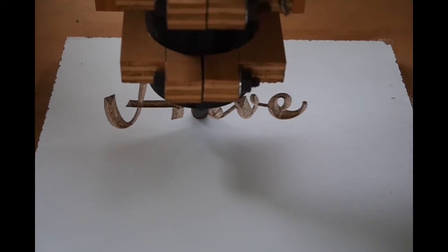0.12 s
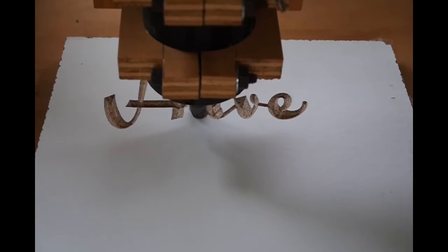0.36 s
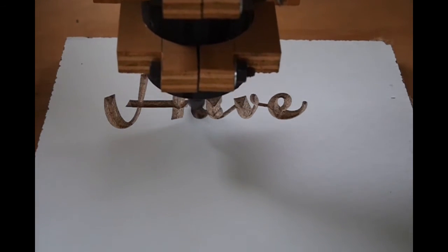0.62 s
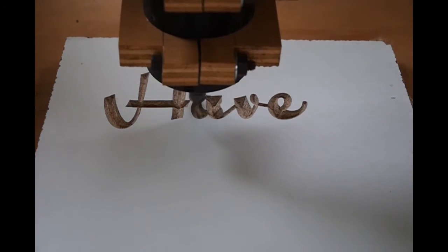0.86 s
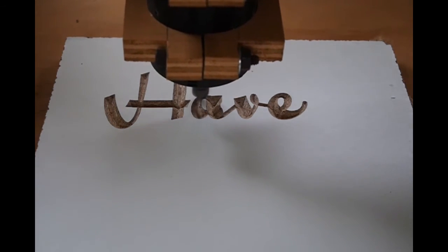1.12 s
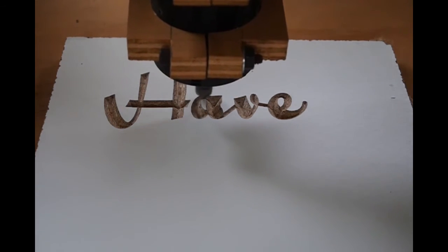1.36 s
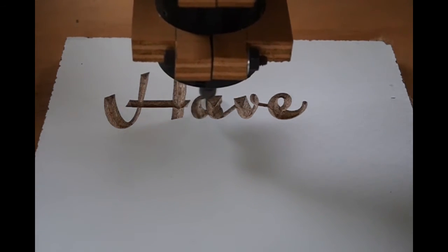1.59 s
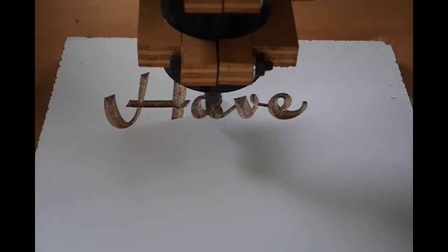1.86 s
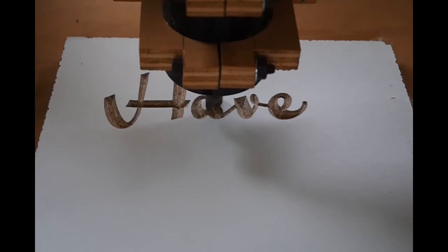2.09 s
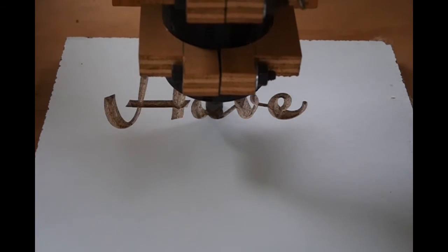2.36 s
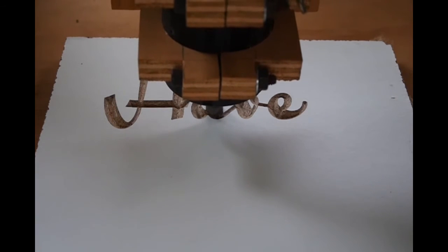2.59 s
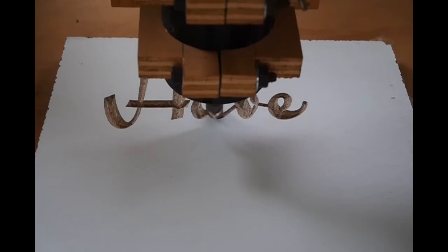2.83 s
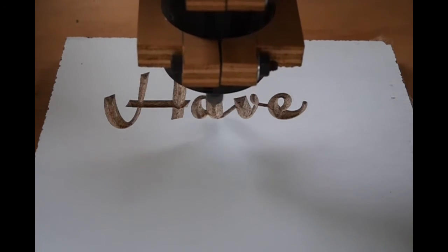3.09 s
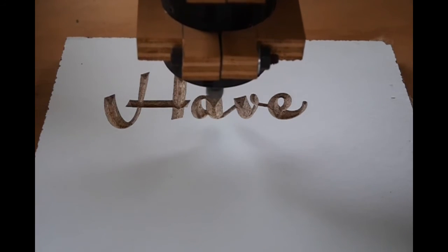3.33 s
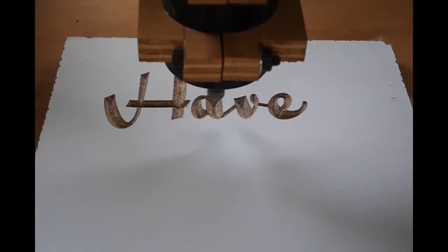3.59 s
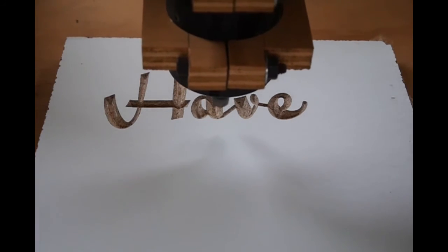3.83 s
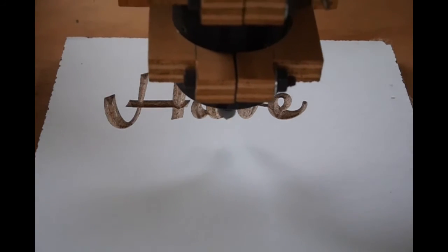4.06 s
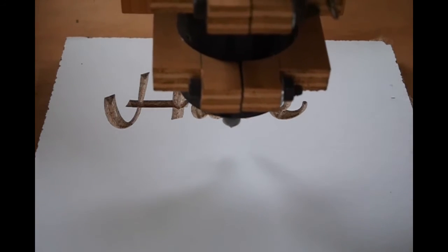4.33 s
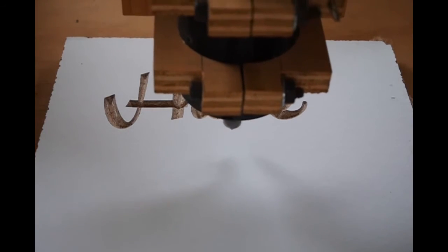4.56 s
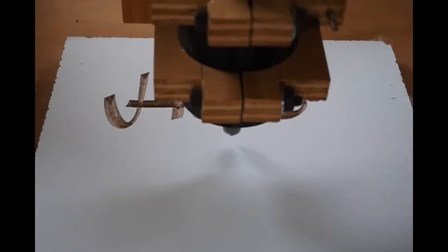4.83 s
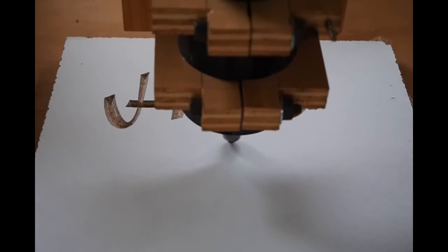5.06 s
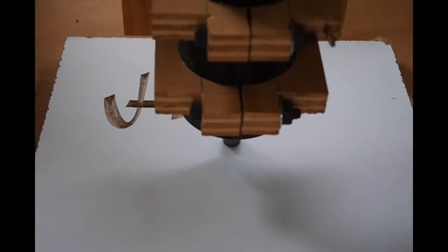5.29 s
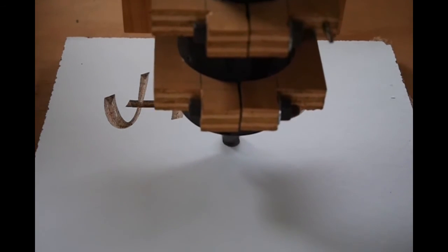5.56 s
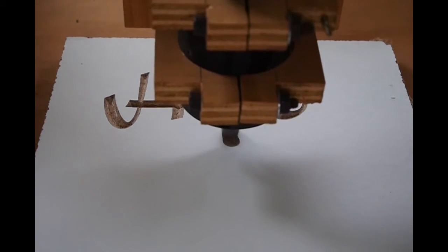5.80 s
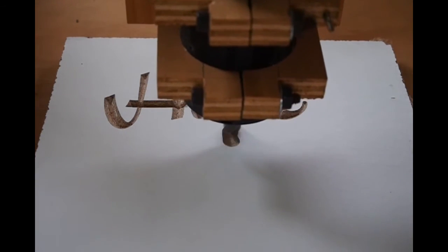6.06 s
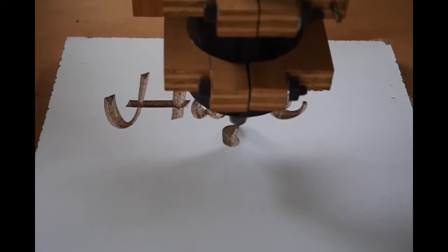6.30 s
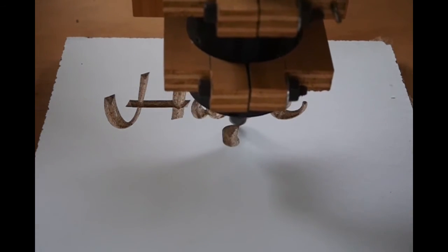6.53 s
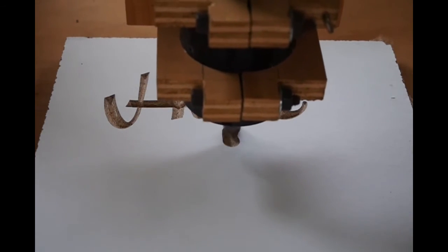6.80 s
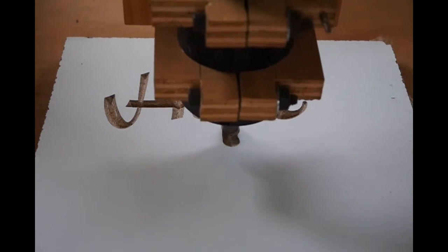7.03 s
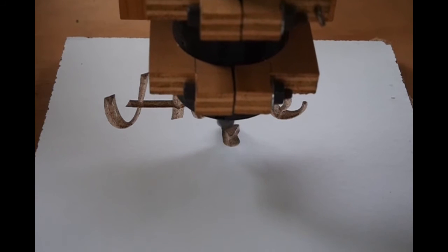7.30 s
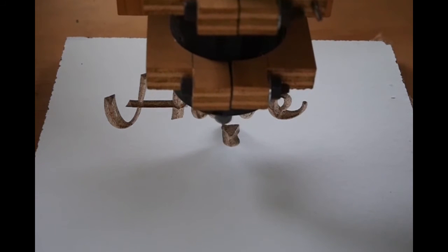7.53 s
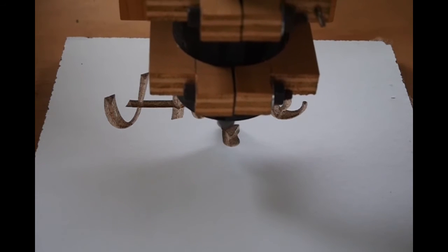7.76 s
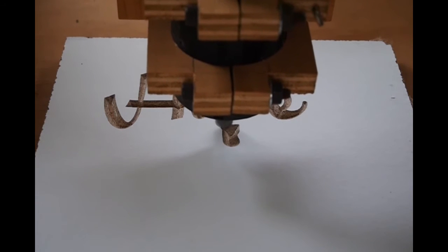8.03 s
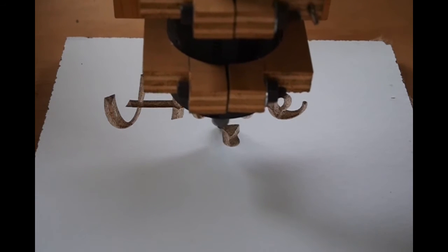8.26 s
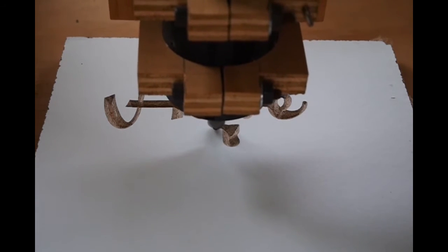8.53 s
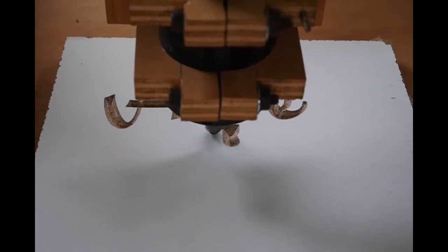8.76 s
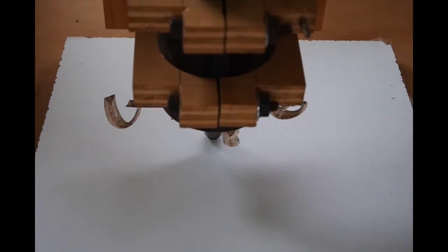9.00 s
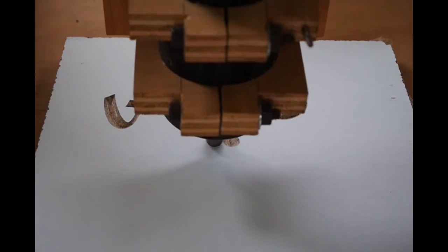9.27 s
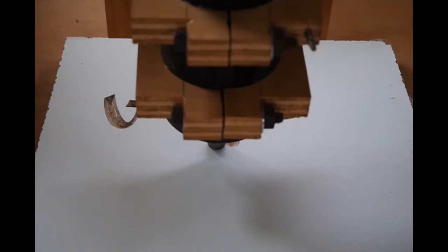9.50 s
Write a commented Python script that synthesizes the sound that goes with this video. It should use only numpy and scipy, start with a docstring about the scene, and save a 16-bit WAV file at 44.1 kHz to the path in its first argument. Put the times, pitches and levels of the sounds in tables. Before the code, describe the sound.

Close up, a little carving spindle holds a piercing layered whine and airy hiss, sagging slightly under deep cuts amid short low motor hums.

```python
"""A small router spindle carves a board close to a camera for 9.6 s, whining at multiples of its 571-590 turns a second.
At first the bit chatters faintly at half the shaft rate until 1.2 s; two step tones of axis travel run down by 2.1 s,
and a fainter short move hums until 2.6 s. From 2.45 s deep cuts bring louder chatter; steppers hum again, a thin tone
sounds at 10/3 of the shaft rate and the shaft sags to its slowest near 4.9 s. Chatter ends at 5.8 s; the shaft recovers
amid short axis moves. Throughout, fan noise rushes and hisses through carriage and housing, over faint microphone noise."""
import sys
import numpy as np
from scipy import signal
from scipy.fft import rfft, irfft, next_fast_len
from scipy.io import wavfile
from scipy.ndimage import uniform_filter1d, map_coordinates

SR = 44100
rng = np.random.default_rng(int(sys.argv[2]) if len(sys.argv) > 2 else 0)


def master_out(mix):
    """Clip the mix to full scale and print it as 16-bit PCM to the path in sys.argv[1]."""
    frames = np.transpose(np.atleast_2d(mix))
    ceiling = np.clip(frames, -1, 1)
    pcm = np.round(ceiling * 32767).astype(np.int16)
    wavfile.write(sys.argv[1], SR, pcm)


def how_loud(loudness_db):
    """Turn decibels into a plain amplitude multiplier (0 dB gives 1, 20 dB gives 10)."""
    steps = np.asarray(loudness_db, float) / 20
    return 10 ** steps


N = 424683


def unit(x):
    """Scaled to rms 1."""
    return x / np.sqrt(np.mean(x ** 2) + 1e-20)


def along(points, hz):
    """(Hz, value) points interpolated on a log frequency axis."""
    point_hz, value = np.transpose(points)
    return np.interp(np.log(hz + 1), np.log(point_hz + 1), value)


def curves(rows):
    """One value per sample for each column after the time in seconds."""
    time_s, *columns = np.transpose(rows)
    return [np.interp(np.arange(N) / SR, time_s, column) for column in columns]


def wobble(knots_per_s):
    """Smooth random curve through normally distributed knots."""
    knots = rng.standard_normal(int(N * knots_per_s / SR) + 4)
    return map_coordinates(knots, [np.arange(N) * knots_per_s / SR])


def filtered(x, response):
    """x with its spectrum multiplied by a response of frequency in Hz."""
    size = next_fast_len(N + SR // 2)
    return irfft(rfft(x, size) * response(np.fft.rfftfreq(size, 1 / SR)), size)[..., :N]


def tone(phase_rad, rms_db, lean_db=0.0, lead_rad=0.0):
    """Stereo sine at random start phase; left exceeds right by lean_db and leads it by lead_rad."""
    phase_rad = phase_rad + rng.uniform(0, 2 * np.pi)
    left = np.sin(phase_rad + lead_rad / 2) * how_loud(lean_db / 2)
    right = np.sin(phase_rad - lead_rad / 2) * how_loud(-lean_db / 2)
    return np.sqrt(2) * how_loud(rms_db) * np.array([left, right])


def passing_db(k):
    """Fades and swells of shaft multiple k as the head passes, each a cosine-squared bump."""
    # By shaft multiple. Each row: middle in seconds, length in seconds, change in dB.
    passing = {2: [(.1, 1.3, 4), (1.25, 1, -16), (3.9, 1.6, 8.5), (6.35, 1.8, 5.5)], 3: [(3.9, 0.94, 4)],
               7: [(2.1, .8, -3), (3.55, 0.81, 0), (6.1, 2, -11)], 5: [(4.9, 2.8, -5)], 8: [(.1, .36, -8),
               (1.66, 0.41, -10), (3.47, 0.31, -15), (4.57, 0.39, -11), (5.22, .36, -10)],
               16: [(4.1, 0.99, -5.5), (5.88, 0.37, -6.5), (7.5, 0.86, -2.5)], 20: [(4.6, 4, 9)],
               22: [(1, 5, 7), (5.5, 1.4, -5)], 11: [(6.9, 2, 4)]}
    t = np.arange(N) / SR
    return sum(change_db * np.cos(np.pi * np.clip((t - middle_s) / length_s, -.5, .5)) ** 2
               for middle_s, length_s, change_db in passing.get(k, []))


def lift_db(hz):
    """Gain of the resonances of carriage and housing."""
    # Each row: centre in Hz, width in Hz, lift in dB.
    body = [(101, 18, 4), (138, 7, 1), (199, 17, 5), (816, 67, 7.5), (908, 92, 8.5), (1294, 190, 4),
            (3550, 120, 4), (3636, 450, 4), (4340, 260, 4)]
    return sum(peak_db / (1 + (2 * (hz - centre_hz) / width_hz) ** 2)
               for centre_hz, width_hz, peak_db in body)


def whine(turn_rad):
    """Commutator, fan blades and bearings sound at whole multiples of the shaft angle."""
    # Strong shaft multiples, in the column order of the next two tables.
    high_orders = (8, 12, 16, 24)
    # Slow levels as the head travels. Each row: time in seconds, then base level in dB of each strong multiple.
    spindle = [(0, -36.5, -32, -23.5, -33), (1.45, -32, -34.5, -22.5, -36), (2.1, -29.5, -34, -23.5, -35.5),
               (3, -32, -39, -22, -38), (3.6, -31.5, -36, -24.5, -34.5), (4.4, -31, -43, -21.5, -34),
               (4.9, -37, -34, -25, -33), (5.6, -27.5, -41, -25, -29.5), (6.2, -25, -38, -26.5, -31),
               (7, -31.5, -34.5, -24, -31), (9.63, -32, -35, -23, -32)]
    # Lean as the head travels. Each row: time in seconds, then left over right in dB of each strong multiple.
    lean = [(0, 13, 0, -1.5, 3), (1.6, 1.5, -1, 2.5, 0), (3.54, 4, -5, -1, -3), (4.65, -9, -5, -2.5, 2),
            (5.7, 3.5, 4, -3.5, -2), (6.75, 5.5, -4, -.6, 0), (9.63, -1, -4, -1.5, -.8)]
    # Weak shaft multiples, and the base level in dB of each.
    weak_orders = (6, 9, 11, 15, 17, 20, 22, 23)
    weak_db = (-45, -51.5, -48.5, -44, -43, -57, -49, -54)

    out = np.zeros((2, N))
    for k, base_db, lean_db in zip(high_orders, curves(spindle), curves(lean)):
        level_db = base_db + passing_db(k) + 0.36 * wobble(13) + 0.99 * wobble(3.97)
        out += tone(k * turn_rad, level_db, lean_db, 0.24 + 0.45 * wobble(1.55))
    for k, base_db in zip(weak_orders, weak_db):
        level_db = base_db + passing_db(k) + 1.5 * wobble(2.2)
        out += tone(k * turn_rad, level_db, 2.5 * wobble(1.15))
    return out


def cutting_edges(turn_rad):
    """Unbalance and edges meeting the wood once a turn sound at low multiples of a shuddering shaft angle."""
    # Shaft multiples whose base level varies with the cut.
    cut_orders = (1, 3, 5)
    # Each row: time in seconds, then base level in dB of each of those multiples.
    cut = [(0, -42.5, -35.5, -38), (1.27, -46, -39, -44), (1.57, -37, -55, -44), (2.5, -35.5, -45, -39),
           (4.2, -33.5, -43, -39.5), (5.7, -40, -50, -46.5), (7.5, -34.5, -57, -41),
           (9.63, -33.5, -57, -49)]
    # Shaft multiples of constant base level, and that level in dB.
    steady_orders = (2, 7)
    steady_db = (-45, -39.5)
    # Mean lean by shaft multiple: left over right in dB.
    low_lean_db = {1: -1.5, 2: 6.5, 3: -7, 5: 2, 7: -4}
    shudder_rad, flicker_db = 0.025, 1.7  # each scales a random curve

    base_db = dict(zip(cut_orders + steady_orders, curves(cut) + list(steady_db)))
    edge_rad = turn_rad + shudder_rad * wobble(30)
    out = tone(4 * edge_rad, base_db[3] - 3.5)  # the fourth rises and falls with the third's base level
    for k, db in base_db.items():
        level_db = db + passing_db(k) + flicker_db * wobble(12)
        out += tone(k * edge_rad, level_db, low_lean_db[k] + wobble(1.6))
    return out


def chatter(turn_rad):
    """Every second turn bites harder, unevenly: tones at half the shaft rate and odd halves of it."""
    # Each row: start in seconds, end in seconds, level in dB.
    spells = [(-.1, 1.2, -55.5), (2.45, 2.953, -46), (3.138, 4.914, -44.5), (5, 5.786, -42.5)]
    # Level in dB of the tones at 5/2 and 7/2 of the shaft rate, against the half tone.
    odd_db = (-1, -1)
    ramp_s = 0.084
    t = np.arange(N) / SR
    bite = sum(how_loud(db) * np.clip(np.minimum(t - start_s, end_s - t) / ramp_s, 0, 1)
               for start_s, end_s, db in spells)
    half = tone(turn_rad / 2 + .4 * wobble(24), 1.8 * wobble(22))
    odd = sum(tone((k + 5 / 2) * turn_rad, db + 1.9 * wobble(3.9)) for k, db in enumerate(odd_db))
    return bite * (half + odd)


def thin_tone(turn_rad):
    """A deep cut sounds at 10/3 of the shaft rate, fading in and out linearly."""
    # Start in seconds, end in seconds, base level in dB.
    thirds = (4.15, 4.85, -42)
    start_s, end_s, db = thirds
    t = np.arange(N) / SR
    fade = np.clip(np.minimum(t - start_s, end_s - t) / .08, 0, 1)
    return fade * tone(10 / 3 * turn_rad, db + 3 * wobble(8))


def steppers():
    """Each move ramps the step rate up, holds it and ramps down; its tones ring louder on a resonance."""
    # Each row: at speed in seconds, braking in seconds, full rate in steps per second,
    # step tone in dB, octave in dB (both at full rate, before resonance and wavering).
    moves = [(-.1, 1.43, 139, -56, -66), (-.1, 1.25, 96, -74, -61), (1.85, 1.96, 106, -62, -66),
             (3.9, 4.36, 138, -54.5, -64), (3.87, 4.45, 97, -69, -59.5), (4.97, 5.1, 97, -65, -64),
             (5.45, 5.72, 96, -61.5, -57), (6.8, 7.05, 97, -70, -55.5), (7.75, 7.8, 98, -72, -59),
             (8.08, 8.25, 94, -74, -59), (8.7, 8.76, 98, -74, -59), (9.25, 9.33, 96, -68, -59)]
    ramp_s = .65  # from rest to speed and back
    slow_fade = 3.5  # the step tone grows with this power of the rate, its multiples more gently
    t = np.arange(N) / SR
    out = np.zeros((2, N))
    for fast_s, brake_s, full_hz, step_db, octave_db in moves:
        span = slice(max(round((fast_s - ramp_s) * SR), 0), round((brake_s + ramp_s) * SR))
        knots_s = [fast_s - ramp_s, fast_s, brake_s, brake_s + ramp_s]
        speed = np.interp(t[span], knots_s, [0, 1, 1, 0])
        rate_hz = full_hz * speed
        steps_rad = 2 * np.pi * np.cumsum(rate_hz) / SR
        partials = ((1, step_db), (3 / 2, octave_db - 5), (2, octave_db), (3, octave_db - 4))
        for k, base_db in partials:
            level_db = base_db + 1.5 * lift_db(k * rate_hz) + 2.4 * wobble(8)[span]
            out[:, span] += speed ** (slow_fade / k) * tone(k * steps_rad, level_db, lead_rad=.4)
    return out


def noise(spectrum, patchy_db):
    """Stereo noise of rms 1 through the body's resonances, with random gain patches and slowly drifting ripple."""
    # Stereo width. Each row: frequency in Hz, side against mid in dB.
    width = [(60, -9), (120, -17), (450, -14.5), (650, -12), (900, -14), (1500, -9.5), (2050, -11),
             (2400, -10.5), (4000, -10), (5100, -6), (7000, -10), (13500, -7), (14600, -9)]
    surge_per_db = 0.07  # patches deepen by this fraction per dB of resonance lift
    ripple_db = 0.97  # rms of fine peaks and dips of colour that drift as the head moves

    def smooth_field(bins, frames):
        rough = rng.standard_normal(z.shape[1:])
        return unit(uniform_filter1d(uniform_filter1d(rough, size=bins, axis=0), size=frames, axis=1))

    bins_hz, _, z = signal.stft(rng.standard_normal((2, N)), SR, nperseg=512)
    depth_db = patchy_db * (1 + surge_per_db * lift_db(bins_hz))[:, None]
    gain_db = depth_db * smooth_field(5, 16) + ripple_db * smooth_field(2, 350)
    pair = signal.istft(z * how_loud(gain_db), SR, nperseg=512)[1][:, :N]
    mid, side = filtered(pair, lambda hz: how_loud(
        along(spectrum, hz) + lift_db(hz) + [0 * hz, along(width, hz)]))
    return unit(np.array([mid + side, mid - side]))


def air(turn_rad):
    """The fan's rush and hiss pulse slightly once a turn; the frame's rumble swells, recedes and wavers."""
    # Low rush in the carriage. Each row: frequency in Hz, relative density in dB per Hz.
    rush_spectrum = [(40, -46), (95, -26.5), (200, -18), (300, -12), (350, -16), (400, -11.5), (700, -10.5),
                     (1450, -8.5), (1520, -16.5), (4000, -67)]
    # Hiss of the fan. Each row: frequency in Hz, relative density in dB per Hz.
    hiss_spectrum = [(300, -60), (1300, -4), (1600, -1), (2800, 2), (3250, -1), (4700, 2.5), (5100, -1),
                     (6100, -1.5), (6800, 1), (8000, -0.5), (9800, 0.5), (13000, -5), (14100, -5),
                     (15100, -12)]
    # Frame rumble. Each row: time in seconds, base gain against the rest of the rush in dB.
    rumble_gain = [(0, -2), (1.4, -6.5), (2.4, -3.5), (4.2, -2.5), (5, 2), (6.3, -1.5), (9.63, -4.5)]
    rumble_db, = curves(rumble_gain)
    rush = noise(rush_spectrum, patchy_db=0.64)
    rumble = filtered(rush, lambda hz: 1 / (1 + (hz / 260) ** 6))
    rush = rush - rumble + how_loud(rumble_db + 1.2 * wobble(3.42)) * rumble
    rush_db = -30 + .8 * wobble(11)
    hiss_db = -22.5 - 0.1061 * np.arange(N) / SR + 0.027 * wobble(3.5)  # recedes as the head moves
    hiss = noise(hiss_spectrum, patchy_db=0.6)
    return (how_loud(rush_db) * rush + how_loud(hiss_db) * hiss) * (1 + 0.03 * np.cos(turn_rad))


def microphones(sound):
    """Faint deep self-noise, partly shared and partly each microphone's own, adds to the sound."""
    # Each row: frequency in Hz, relative density in dB per Hz.
    self_noise = [(15, -2), (45, -2), (90, -6), (300, -40)]
    shared, own = rng.standard_normal(N), rng.standard_normal((2, N))
    deep = filtered(shared + .9 * own, lambda hz: how_loud(along(self_noise, hz)))
    return sound + how_loud(-77) * unit(deep)


def scene():
    """All parts of the spindle follow one shaft angle; the shaft sags under load."""
    # Each row: time in seconds, shaft speed in turns per second.
    speed = [(0.0, 586.1), (0.66, 584.59), (1.11, 584.25), (1.32, 584.8), (1.83, 587.17), (2.34, 588.37),
             (3.15, 588.3), (3.48, 586.38), (3.6, 585.45), (4.29, 575.78), (4.5, 573.41), (4.71, 571.95),
             (4.89, 571.46), (5.1, 572.63), (6.18, 581.62), (6.84, 585.34), (7.95, 588.45), (9.63, 589.58)]
    shaft_hz = uniform_filter1d(curves(speed)[0], size=6000, mode="nearest")  # inertia rounds speed changes
    turn_rad = 2 * np.pi * np.cumsum(shaft_hz) / SR
    spindle_sound = whine(turn_rad) + cutting_edges(turn_rad) + chatter(turn_rad) + thin_tone(turn_rad)
    return spindle_sound + steppers() + air(turn_rad)


def band_limit(x):
    """A steep low-pass at the top of the band."""
    return signal.sosfilt(signal.butter(12, 15890, fs=SR, output="sos"), x)


def record(dry):
    """Microphones differ in level and lose deep bass; the camera dips one narrow band and ends at its top."""
    # Level difference. Each row: frequency in Hz, left over right in dB.
    tilt = [(400, -0.7), (2400, 0.5), (9000, -0.5)]
    # The camera's narrow dip: centre in Hz, width in Hz, depth from 0 to 1.
    notch = (7850, 90, .95)
    top_hz, bass_hz = 15150, 87
    centre_hz, width_hz, depth = notch

    def response(hz):
        balance = how_loud(np.array([[.5], [-.5]]) * along(tilt, hz))
        dip = 1 - depth / (1 + (2 * (hz - centre_hz) / width_hz) ** 2)
        ends = (hz < top_hz) / np.sqrt(1 + (bass_hz / (hz + 1)) ** 6)
        return balance * dip * ends

    return band_limit(microphones(filtered(dry, response)))


dry = scene()
out = record(dry)
master_out(out)
```